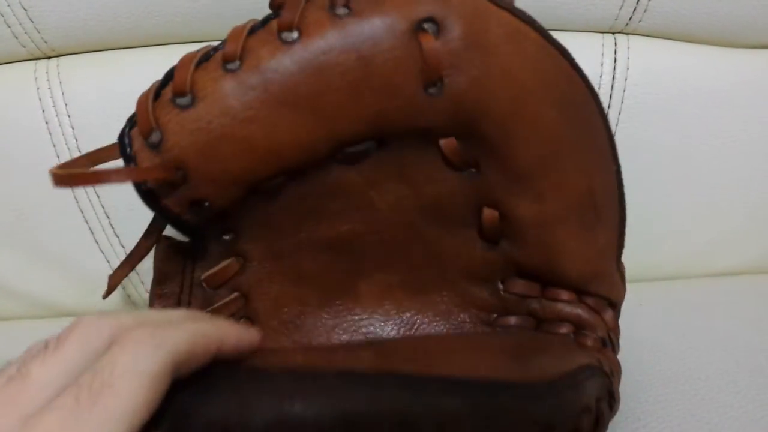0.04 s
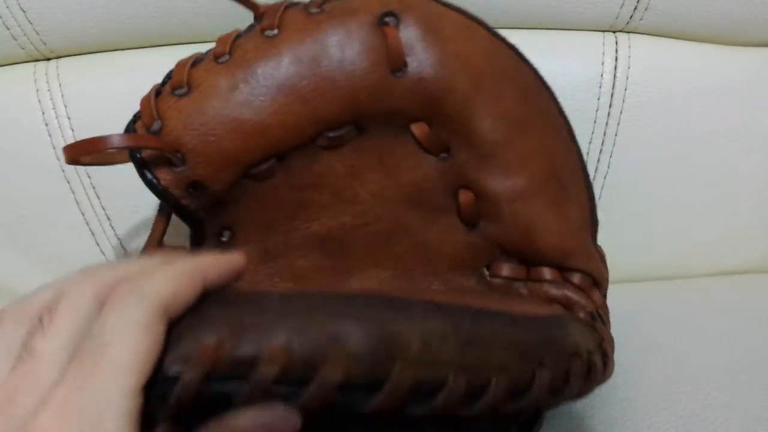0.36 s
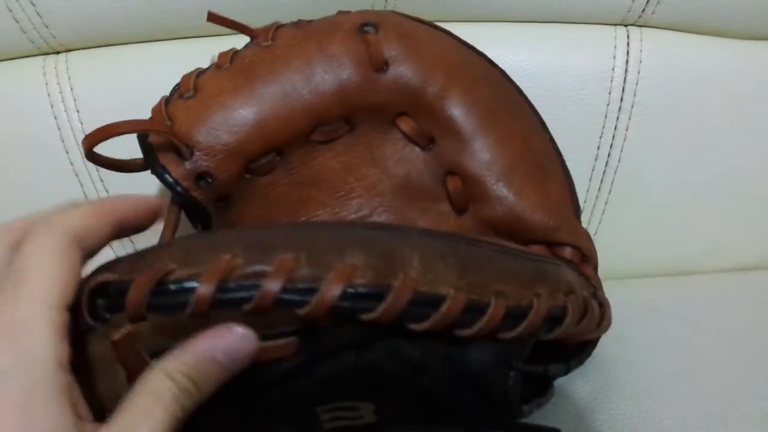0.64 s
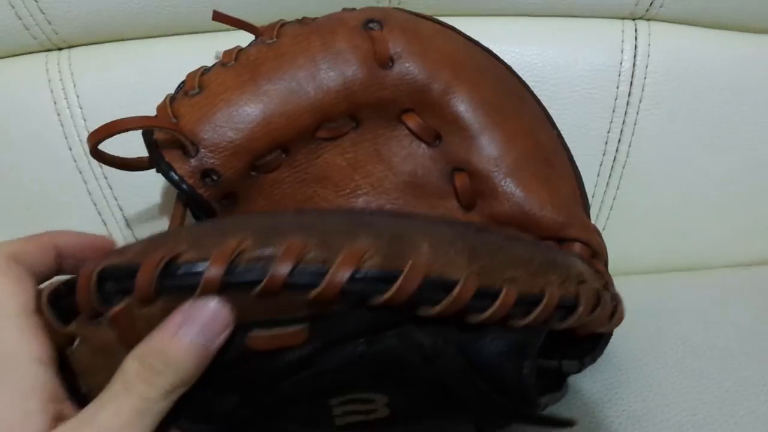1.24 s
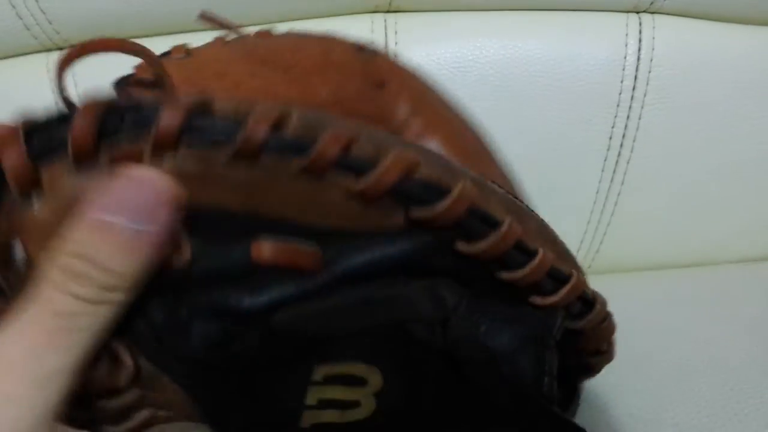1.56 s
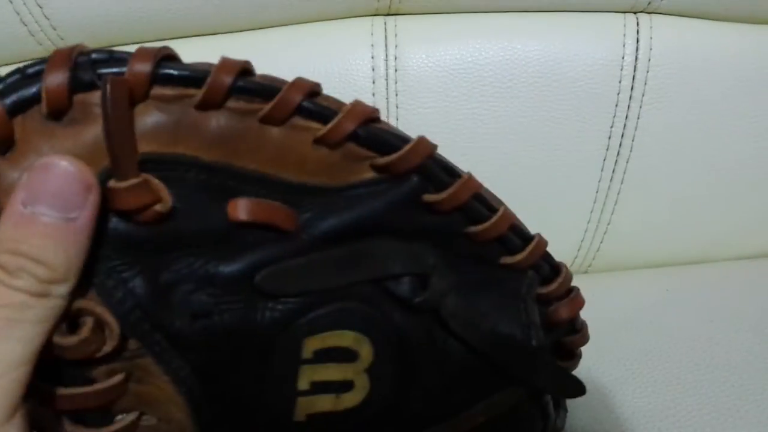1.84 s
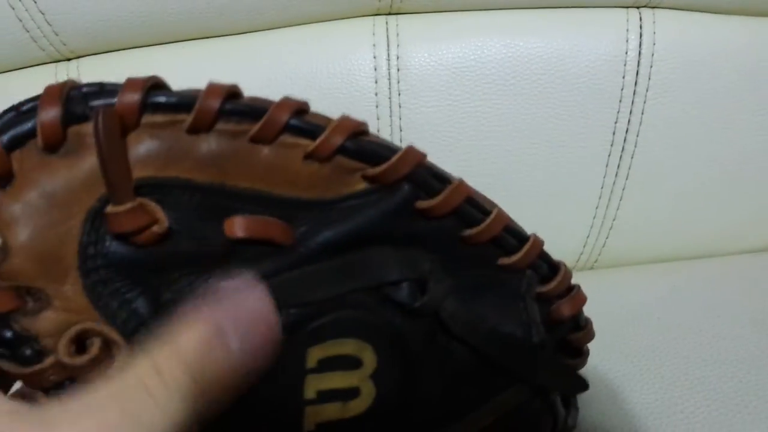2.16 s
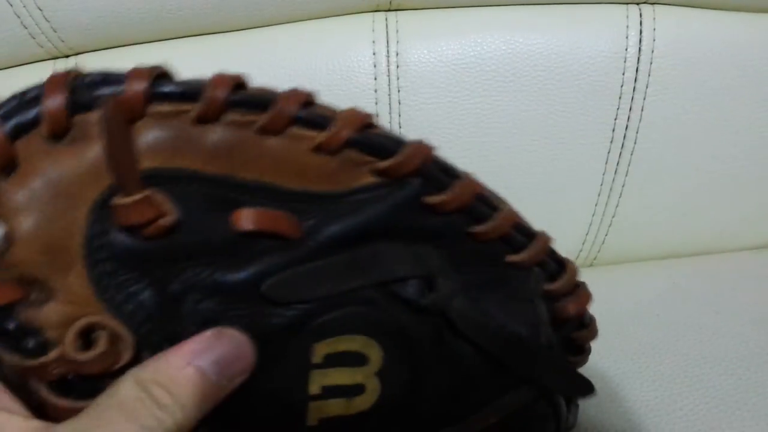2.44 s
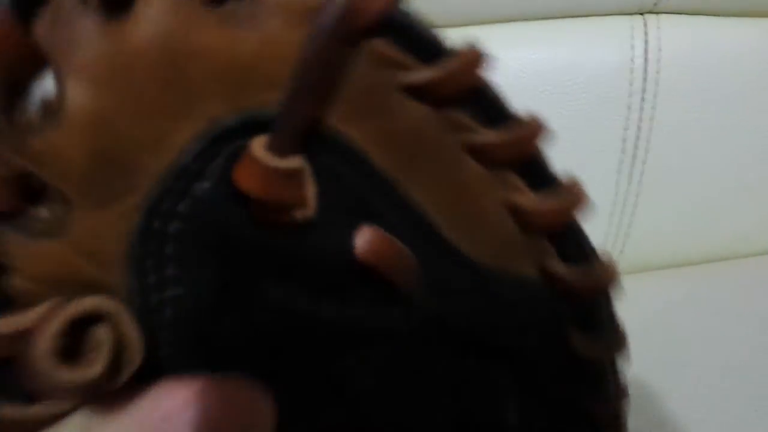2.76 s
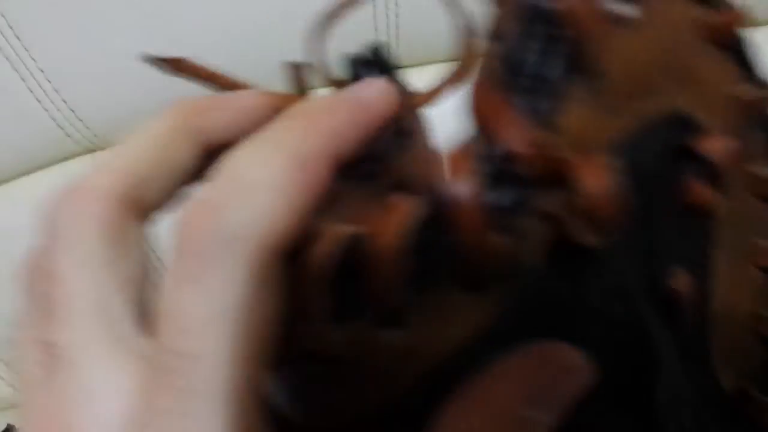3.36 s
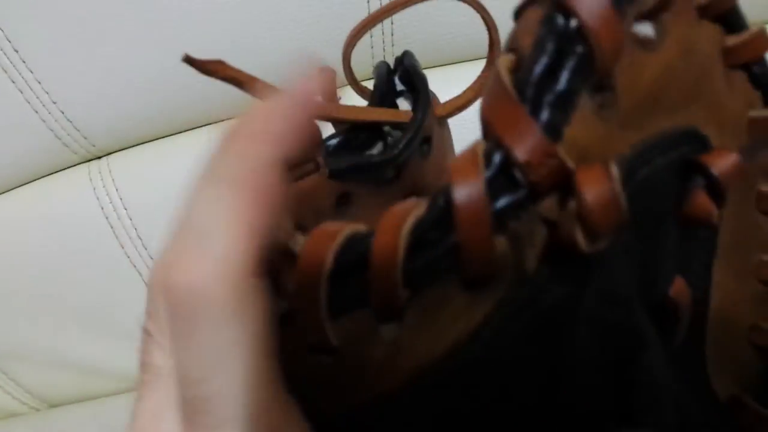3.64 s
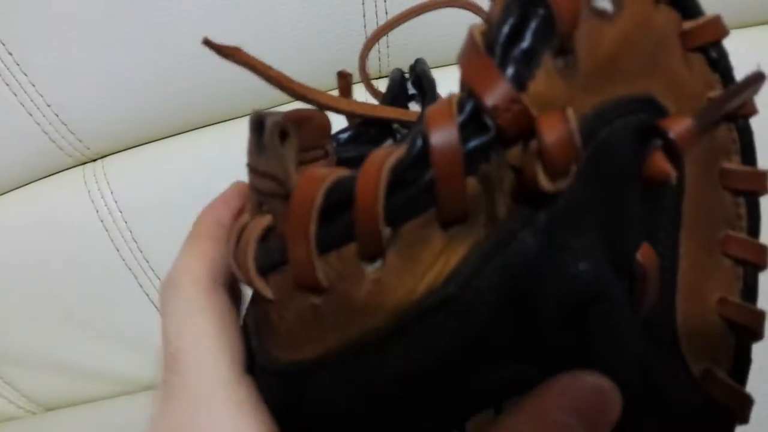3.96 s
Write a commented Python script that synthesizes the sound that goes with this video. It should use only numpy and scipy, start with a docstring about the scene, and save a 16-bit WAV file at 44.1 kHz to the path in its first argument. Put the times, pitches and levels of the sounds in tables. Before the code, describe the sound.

A leather mitt is handled close to the microphone in a quiet room. It slides on a padded couch, then is lifted and turned over, with hissy rubbing, soft hollow bumps and small ticks from its laces.

```python
"""In a quiet room, a leather mitt is shifted on a padded couch, lifted and turned over close by.
Stick-slip friction makes the sliding leather hiss, while coarser catches excite the resonances
of the hollow mitt. Fingers and padding bump in damped pulses, laces and seams tick, and bending
leather squeaks. Beneath lie faint shudders of the couch, a short reverberation and steady room noise."""
import sys
import numpy as np
from scipy import signal
from scipy.fft import rfft, irfft
from scipy.io import wavfile

SR = 44100
rng = np.random.default_rng(int(sys.argv[2]) if len(sys.argv) > 2 else 0)


def log_audio(samples):
    """Write samples as a 16-bit WAV file to the path given in sys.argv[1]."""
    # one column per channel
    frames = np.atleast_2d(samples).T
    # limit to full scale, then quantise
    limited = np.clip(frames, -1, 1)
    pcm = np.round(limited * 32767).astype(np.int16)
    wavfile.write(sys.argv[1], SR, pcm)


N = 176400
T = np.arange(N) / SR
FREQ_HZ = np.fft.rfftfreq(N, 1 / SR)


def amp(db):
    """Amplitude ratio of a level in decibels."""
    return 10 ** (np.asarray(db) / 20)


def unit(x):
    """Normalisation to rms 1."""
    return x / np.sqrt(np.mean(x ** 2) + 1e-20)


def envelope(curve, column=1):
    """Gain over time, interpolated in decibels; silent outside the curve."""
    rows = np.array(curve)
    return amp(np.interp(T, rows[:, 0], rows[:, column], left=-np.inf, right=-np.inf))


def add(mix, start_s, sound):
    """Superposition: a sound joins the mix at its start time."""
    part = mix[:, max(round(start_s * SR), 0):][:, :sound.shape[1]]
    part += sound[:, :part.shape[1]]


def colour(x, spectrum):
    """Minimum-phase filtering, one gain column per channel; the result has rms 1."""
    hz, *sides = np.transpose(spectrum)
    f = abs(np.fft.fftfreq(4096, 1 / SR))
    log_gain = np.log(amp([np.interp(np.log(f + 1), np.log(hz), side) for side in sides]))
    taps = np.fft.ifft(np.exp(np.conj(signal.hilbert(log_gain)))).real[:, :2048]
    return unit(signal.fftconvolve(np.atleast_2d(x), taps, axes=1)[:, :N])


def slips(per_s, spread_db, channels=2):
    """Stick-slip as shot noise: impulses at random times, their size different in each channel."""
    size = amp(spread_db * np.minimum(rng.exponential(1, N), 5))
    occurs = rng.random(N) < per_s / SR
    return size * occurs * rng.standard_normal((channels, N))


def judder(cutoff_hz, depth_db):
    """Random modulation: the unsteady hand, as a factor that wanders about 1."""
    slow_noise = irfft(rfft(rng.standard_normal(N)) / (1 + (FREQ_HZ / cutoff_hz) ** 4), N)
    return amp(depth_db * unit(slow_noise))


# strength of the slide on the couch, relative levels: time_s, hiss_db, fizz_db
SLIDE_LEVELS = [(0, -55.5, -66), (0.27, -51, -64), (0.405, -52, -65), (0.44, -49, -60), (0.5, -49.5, -55),
                (0.66, -46.5, -57.5), (0.78, -50, -59), (0.825, -56, -71), (1.0, -67, -69),
                (1.07, -58.5, -69), (1.13, -67, -72), (1.25, -68, -71)]
# spectral shape of leather on the couch: frequency_hz, left_db, right_db
SLIDE_SPECTRUM = [(300, -28, -32), (1020, -21.5, -17.5), (1470, -16, -16.5), (2000, -10, -14.5),
                  (2880, -7.5, -8), (3600, -8, -15), (4400, -3, -14), (5260, -4, -12), (5870, -3, -6.5),
                  (7030, -10, -8.5), (10000, -19, -20.5), (15000, -36, -25)]
FINE_SLIPS_PER_S = 19600

def slide(gain_db=3):
    """Sliding friction: dense slips of leather on the couch merge into a hiss."""
    hiss = colour(slips(FINE_SLIPS_PER_S, spread_db=0), SLIDE_SPECTRUM)
    return amp(gain_db) * envelope(SLIDE_LEVELS) * hiss


# the hand's lift, thumb stroke, turn and new grip, relative levels: time_s, hiss_db, fizz_db
RUB_LEVELS = [(1.25, -67, -68), (1.31, -60, -67), (1.36, -52.5, -64), (1.43, -54.5, -62),
              (1.52, -48, -52.5), (1.71, -43, -53), (1.79, -45, -59), (1.84, -56, -62), (1.95, -64, -74),
              (2.13, -64, -68), (2.19, -45.5, -64), (2.26, -56.5, -65.5), (2.35, -68.5, -71),
              (2.49, -64, -70), (2.57, -51, -62), (2.64, -44.5, -53), (2.69, -45, -62), (2.77, -47, -57),
              (2.81, -43.5, -51.5), (2.87, -47, -56), (3.02, -44, -55.5), (3.06, -54.5, -61.5),
              (3.13, -53.5, -61.5), (3.18, -50, -59), (3.23, -55, -61.5), (3.28, -53, -53.5),
              (3.35, -53.5, -61.5), (3.5, -64, -66.5), (3.58, -58.5, -63.5), (3.66, -52.5, -56.5),
              (3.71, -68.5, -69), (3.77, -54.5, -59), (3.8, -63.5, -66), (3.84, -54.5, -65),
              (3.92, -66.5, -67.5), (4, -60, -71)]
# spectral shape of the hand on leather: frequency_hz, left_db, right_db
RUB_SPECTRUM = [(300, -21, -35), (990, -12, -0.5), (1400, -4, -3), (2030, -2.5, -7.5), (2850, 4.5, -5.5),
                (3700, 1, -5.5), (4600, 5.5, -8), (5800, 2.5, -6.5), (6800, -8.5, -6.5),
                (10100, -19.5, -20), (15100, -28, -14.5)]
HAND_SLIPS_PER_S, HAND_SPREAD_DB = 9800, 1.5

def rub(gain_db=3.5, echo_s=0.000614, echo_db=-11):
    """Comb filtering: slips echo in the changing gap between hand and leather, so resonances wander."""
    direct = slips(HAND_SLIPS_PER_S, HAND_SPREAD_DB)
    samples = np.arange(N)
    delay = echo_s * SR * judder(cutoff_hz=8.65, depth_db=2.5)
    echo = np.array([np.interp(samples - delay, samples, side) for side in direct])
    return amp(gain_db) * envelope(RUB_LEVELS) * colour(direct + amp(echo_db) * echo, RUB_SPECTRUM)


# spectral shape of the finest slips: frequency_hz, left_db, right_db
FIZZ_SPECTRUM = [(2980, -6.5, -64), (6200, 3, -6.5), (8700, -4, -2.5), (10800, -6.5, -5), (12800, -9.5, -6),
                 (16300, -22, -21)]

def fizz(gain_db=5.5):
    """Small-scale friction: the finest slips give both slide and rub their top treble."""
    strength = envelope(SLIDE_LEVELS, column=2) + envelope(RUB_LEVELS, column=2)
    return amp(gain_db) * strength * colour(slips(FINE_SLIPS_PER_S, spread_db=-1), FIZZ_SPECTRUM)


# skin gripping leather: centre_s, half_width_s, centre_hz, level_db (relative)
FINGER_RASPS = [(0.264, 0.017, 4400, -51), (0.51, 0.089, 6200, -47), (1.4, 0.082, 4650, -53.5),
                (2.2, 0.0078, 4000, -52), (2.639, 0.038, 4670, -44.5), (2.735, 0.041, 3700, -44),
                (2.80, 0.022, 4800, -43.5), (2.835, 0.029, 3700, -45.5), (3.007, 0.033, 2350, -49.5),
                (3.2, 0.033, 5800, -53), (3.632, 0.016, 3020, -50), (3.663, 0.026, 4600, -48.5)]

def rasps(width_octaves=0.48, left_db=3, right_db=-20):
    """Band-limited friction: a fingertip that grips harder gathers its slips into one band."""
    out = np.zeros((2, N))
    slip_spectrum = rfft(slips(HAND_SLIPS_PER_S, HAND_SPREAD_DB))
    for centre_s, half_s, hz, db in FINGER_RASPS:
        detuning = np.log2((FREQ_HZ + 1) / hz) / width_octaves
        band = unit(irfft(slip_spectrum / (1 + detuning ** 2) ** 2, N))
        out += amp(db) * np.exp(-((T - centre_s) / half_s) ** 2) * band
    return out * amp([[left_db], [right_db]])


# drumming of the dragged mitt, relative levels: time_s, bass_db, middle_db
DRUM_LEVELS = [(0, -62.5, -62), (0.2, -68.5, -68), (0.26, -53, -54.5), (0.33, -63.5, -63),
               (0.5, -53, -56.5), (0.61, -65, -58), (0.645, -51, -48), (0.74, -55, -57), (0.82, -61.5, -61),
               (1.0, -68, -77), (1.07, -62, -57), (1.11, -72, -69), (1.3, -57, -58.5), (1.36, -56, -60),
               (1.43, -57, -55), (1.57, -49, -43), (1.675, -43.5, -39.5), (1.73, -47.5, -48),
               (1.78, -47, -38), (1.825, -50, -49), (1.93, -65, -63), (2.13, -63, -62.5),
               (2.2, -60.5, -51.5), (2.34, -66, -62), (2.42, -70, -62.5), (2.46, -56.5, -64),
               (2.53, -74, -60.5), (2.6, -51, -43), (2.7, -49, -46.5), (2.77, -55, -51.5),
               (2.87, -58.5, -45), (2.95, -51.5, -45), (3.02, -47, -38.5), (3.06, -58.5, -55.5),
               (3.22, -74, -59), (3.28, -55, -50), (3.38, -56.5, -53), (3.48, -73.5, -62.5),
               (3.63, -62.5, -57), (3.7, -75, -71), (3.84, -61, -58.5), (3.92, -79, -71), (4, -67, -57)]
# low resonances of the hollow mitt: frequency_hz, gain_db
BASS_SPECTRUM = [(30, -17), (70, -11), (110, 3), (150, -6.5), (185, 7.5), (225, -8.5), (265, 1), (340, -2),
                 (450, -4), (700, -21), (1500, -53)]
# its middle resonances: frequency_hz, gain_db
MIDDLE_SPECTRUM = [(100, -36.5), (300, -22.5), (400, -6.5), (465, -1), (530, -1.5), (600, 4), (700, 1.5),
                   (810, 1.5), (960, -1.5), (1150, -8.5), (1380, -11.5), (1600, -17), (2500, -12.5),
                   (6000, -111)]

def drumming(catches_per_s=1500, spread_db=1.7, bass_db=3, middle_db=-2.5):
    """Forced vibration: coarse catches of the leather drive the resonances of the hollow mitt."""
    catches = slips(catches_per_s, spread_db, channels=1) + 0.24 * slips(catches_per_s, spread_db)
    bass = amp(bass_db) * envelope(DRUM_LEVELS) * colour(catches, BASS_SPECTRUM)
    middle = amp(middle_db) * envelope(DRUM_LEVELS, column=2) * colour(catches, MIDDLE_SPECTRUM)
    return bass + middle


def damped_pulse(t, hz, damping):
    """Heavily damped oscillation: a sine that swells and dies in a cycle or two; peak 1."""
    pulse = np.sin(2 * np.pi * hz * t) * t * np.exp(-damping * hz * t)
    return pulse / abs(pulse).max()


# soft pushes on the padding: start_s, level_db (relative), pitch_hz
PADDING_BUMPS = [(0.4077, -35.5, 366), (0.483, -45, 400), (0.631, -30, 370), (.638, -33, 700),
                 (0.643, -39, 328), (0.6748, -28.5, 526), (0.739, -37.5, 510), (0.885, -40, 574),
                 (.919, -42.5, 630), (1.051, -39.5, 510), (1.058, -43.5, 257), (1.133, -44.5, 800),
                 (1.1977, -39.5, 630), (1.2661, -40, 447), (1.3104, -33, 580), (1.342, -36, 560),
                 (1.35, -42, 300), (1.358, -38.5, 345), (1.669, -37, 250), (1.689, -44, 330),
                 (1.72, -35, 165), (1.741, -31, 670), (1.761, -37, 643), (1.768, -28, 590),
                 (1.821, -33, 800), (1.990, -45.5, 326), (2.074, -42, 615), (2.2235, -39.5, 610),
                 (2.5159, -37, 740), (2.5345, -37, 800), (2.584, -28, 380), (2.6026, -25.5, 650),
                 (2.915, -44, 450), (3.140, -36.5, 705), (3.182, -39, 650), (3.252, -37, 746),
                 (3.279, -49, 254), (3.3055, -34, 750), (3.4515, -35, 940), (3.376, -44.5, 500),
                 (3.601, -40.5, 800), (3.7266, -38, 800), (3.8189, -40.5, 584), (3.992, -46, 600)]
# modes of the mitt's pocket: frequency_hz, gain_db, t60_s
POCKET_MODES = [(189, -13, 0.093), (263, -8.5, 0.049), (760, -16.5, 0.033)]

def bumps():
    """Modal excitation: the slower a damped push, the more the pocket rings after it."""
    out, t = np.zeros((2, N)), np.arange(SR // 8) / SR
    # the grip retunes the modes a little at each bump
    stretches = 1 + 0.1 * rng.uniform(-0.73, 1, (len(PADDING_BUMPS), len(POCKET_MODES)))
    for (start_s, db, push_hz), mode_stretches in zip(PADDING_BUMPS, stretches):
        push = damped_pulse(t, push_hz, damping=3.4)
        ring = np.zeros_like(t)
        for (mode_hz, mode_db, t60_s), stretch in zip(POCKET_MODES, mode_stretches):
            decay = amp(mode_db - 60 * t / t60_s)
            ring += mode_hz / push_hz * decay * np.sin(2 * np.pi * mode_hz * stretch * t)
        onset = np.minimum(push_hz * t, 1)
        add(out, start_s, -amp(db) * (push + ring * onset)[None])
    return out


# laces and seams snapping free: start_s, level_db (relative), pitch_hz
LACE_TICKS = [(0.4064, -30, 1900), (0.762, -25, 4500), (.833, -38.5, 2000), (0.8834, -35, 3940),
              (.8838, -38, 1400), (1.0517, -36, 4040), (1.054, -33, 4200), (1.1975, -41.5, 2470),
              (1.256, -35, 3600), (1.267, -38.5, 2460), (1.31, -38, 1520), (1.712, -20, 4500),
              (1.7826, -30, 2820), (1.8861, -34.5, 3500), (2.071, -33.5, 3600), (2.135, -35.5, 4500),
              (2.2224, -35, 2400), (2.377, -44.5, 1690), (2.435, -40, 1400), (2.514, -32, 2750),
              (2.5328, -29, 3460), (2.578, -30, 3500), (2.615, -22, 3930), (2.647, -29, 4730),
              (3.0076, -26, 4200), (3.267, -23.5, 5100), (3.274, -28, 7000), (3.3037, -26, 3600),
              (3.447, -34, 2800), (3.4523, -40, 2000), (3.7262, -30.5, 4050), (3.7271, -45, 1590),
              (3.817, -31, 4200), (3.8172, -35.5, 10000), (3.8202, -30.5, 1920), (3.8208, -27.5, 4600),
              (3.84, -38, 1750), (3.8587, -37, 4170)]

def ticks(crack_db=-11, skips_db=-0.5, skip_decay_s=0.0033, right_db=-5.5):
    """Impulse response: a lace snaps free and skips, each contact a crack and a brief ring."""
    out, t = np.zeros((2, N)), np.arange(SR // 30) / SR
    impulse = t == 0
    for start_s, db, hz in LACE_TICKS:
        snap = damped_pulse(t, hz, damping=3.27) + amp(crack_db) * impulse
        skips = rng.standard_normal((2, len(t))) ** 3 * np.exp(-t / skip_decay_s) * (t > 0.0005)
        drive = impulse + amp(skips_db) * skips / np.linalg.norm(skips, axis=1, keepdims=True)
        add(out, start_s, amp(db) * signal.fftconvolve(drive, snap[None], axes=1))
    return out * amp([[0], [right_db]])


# squeaks of bending leather: start_s, pitch_hz, level_db (relative)
LEATHER_SQUEAKS = [(0.828, 830, -54), (1.756, 693, -37.5)]

def squeaks(rise_s=0.009, sag_s=0.23):
    """Frequency glide: bending leather gives a brief tone whose pitch sags exponentially."""
    out, t = np.zeros((2, N)), np.arange(SR // 10) / SR
    swell = t / rise_s * np.exp(1 - t / rise_s)
    for start_s, hz, db in LEATHER_SQUEAKS:
        phase = 2 * np.pi * np.cumsum(hz * np.exp(-t / sag_s)) / SR
        add(out, start_s, amp(db) * (swell * np.sin(phase))[None])
    return out


# shudders of the cushion: centre_s, half_width_s, pitch_hz, level_db
CUSHION_SHUDDERS = [(0.798, 0.2, 45, -57), (1.32, 0.11, 45.7, -61), (1.765, 0.065, 58.2, -61),
                    (3.065, .1, 56, -59), (3.378, .03, 51.6, -54)]

def cushion():
    """Low-frequency vibration: the couch shudders faintly under the mitt's weight."""
    return sum(amp(db) * np.exp(-((T - centre_s) / half_s) ** 2) * np.sin(2 * np.pi * hz * (T - centre_s))
               for centre_s, half_s, hz, db in CUSHION_SHUDDERS)


def reflections(x, decay_s=0.011):
    """Early reflections: mitt, hand and couch return ten echoes to each channel."""
    taps = np.zeros((2, SR // 50))
    delay_s = rng.uniform(0.0008, 0.012, (2, 10))
    gains = rng.choice([-1., 1.], delay_s.shape) * np.exp(-delay_s / decay_s)
    np.put_along_axis(taps, (delay_s * SR).astype(int), gains, axis=1)
    return signal.fftconvolve(x, taps / np.linalg.norm(taps[0]), axes=1)[:, :N]


# reverberation time of the room: frequency_hz, t60_s
ROOM_DECAY = [(100, 0.27), (500, 0.59), (3000, 0.12), (12000, 0.18)]

def reverberation(x):
    """Diffuse field: a short tail of noise decays exponentially, the treble first."""
    hz, t, noise = signal.stft(rng.standard_normal((2, SR // 2)), SR, nperseg=256)
    band_hz, band_t60_s = np.transpose(ROOM_DECAY)
    t60_s = np.interp(np.log(hz + 1), np.log(band_hz), band_t60_s)
    decay = amp(-60 * t / t60_s[:, None])
    tail = signal.istft(noise * decay * (t > 0.004), SR, nperseg=256)[1]
    return signal.fftconvolve(x, tail / np.linalg.norm(tail[0]), axes=1)[:, :N]


# spectral shape of the still room and microphone hiss: frequency_hz, left_db, right_db
NOISE_SPECTRUM = [(20, -29, -51), (45, 10.5, 8), (108, 8.5, 2), (197, -1, 4.5), (400, 0, 0),
                  (850, -11, -4.5), (1200, -5, -6.5), (2110, -14, -11.5), (2600, -4, 4.5), (3600, -9, -2.5),
                  (4500, -12, -8), (5080, -16, 2.5), (6200, -5, 9), (7900, -41.5, -2.5), (9200, -23, -9.5),
                  (15500, -9.5, -8)]

def room_noise(level_db=-56.5, coherent_below_hz=800):
    """Partial coherence: steady noise, largely common to both channels in the bass."""
    coherence = 0.75 / (1 + (FREQ_HZ / coherent_below_hz) ** 2)
    noise = rfft(rng.standard_normal((3, N)))
    stereo = irfft(np.sqrt(coherence) * noise[0] + np.sqrt(1 - coherence) * noise[1:], N)
    return amp(level_db) * colour(stereo, NOISE_SPECTRUM)


def scene():
    """Superposition of the nearby mitt, its reverberation, the couch and the room noise."""
    hiss = slide() + (rub() + fizz()) * judder(cutoff_hz=140, depth_db=1.02)  # uneven hand pressure
    hiss += rasps()
    mitt = hiss + amp(-11.5) * reflections(hiss) + ticks()
    mitt += (drumming() + bumps() + squeaks()) * amp([[-2], [0]])  # weaker on the left
    return mitt + amp(-20.5) * reverberation(mitt) + cushion() + room_noise()


def record(dry):
    """Attenuation and band limiting: the level dips briefly once, and a low-pass trims the top treble."""
    dip_at_s, dip_half_s, dip_db, cutoff_hz = 2.096, 0.0046, -9, 15600
    dip = amp(dip_db * np.exp(-((T - dip_at_s) / dip_half_s) ** 2))
    low_pass = signal.firwin(511, cutoff_hz, window=("kaiser", 9), fs=SR)
    return signal.oaconvolve(dry * dip, low_pass[None], "same")


dry = scene()
out = record(dry)
log_audio(out)
```